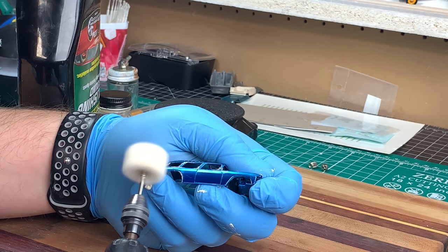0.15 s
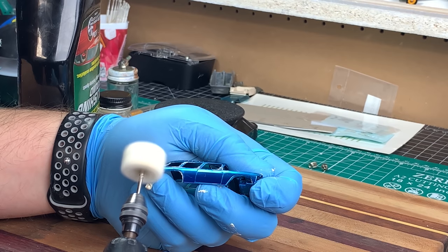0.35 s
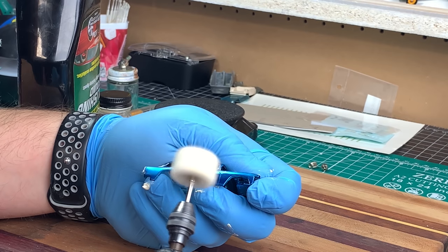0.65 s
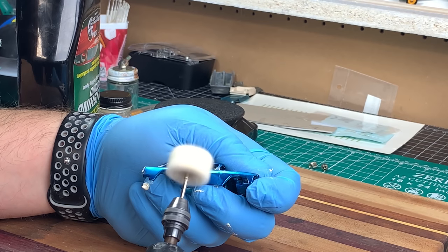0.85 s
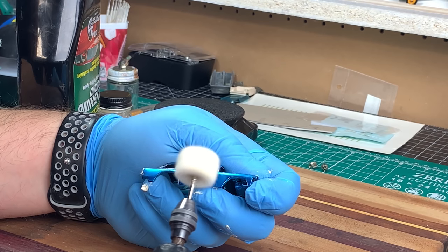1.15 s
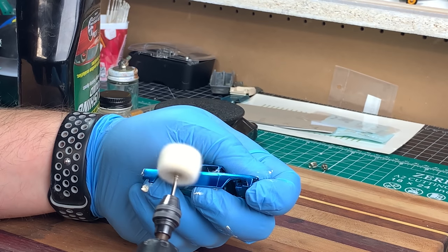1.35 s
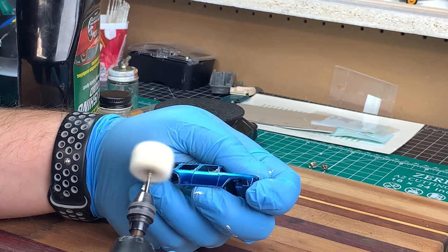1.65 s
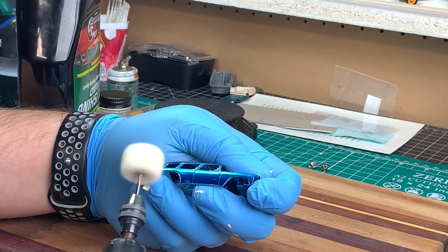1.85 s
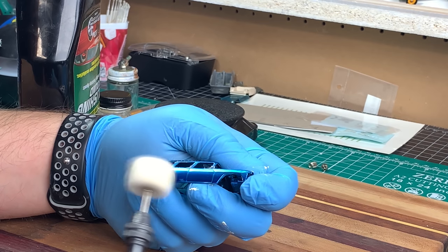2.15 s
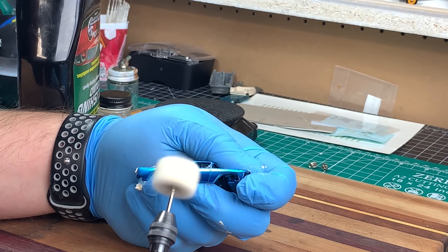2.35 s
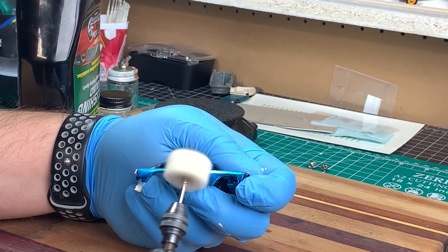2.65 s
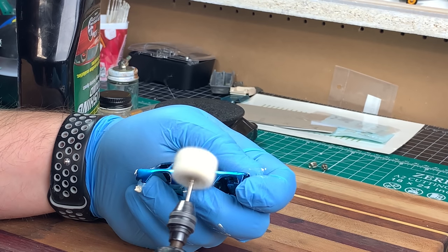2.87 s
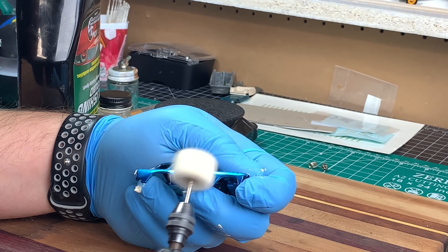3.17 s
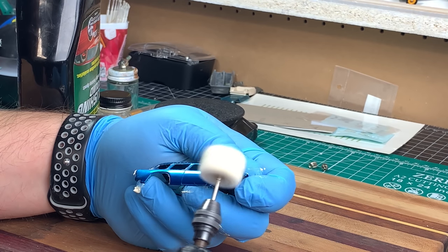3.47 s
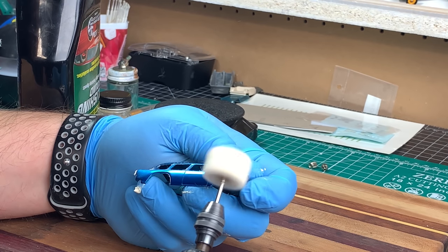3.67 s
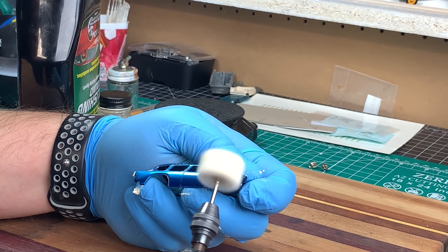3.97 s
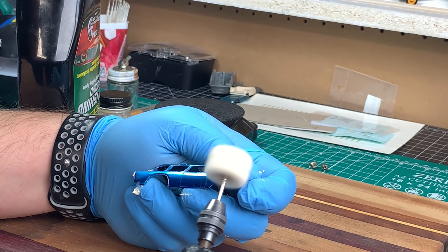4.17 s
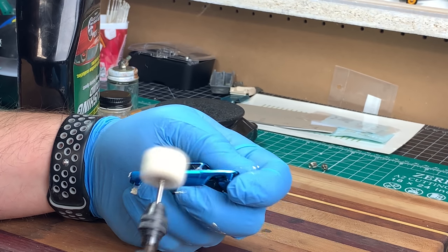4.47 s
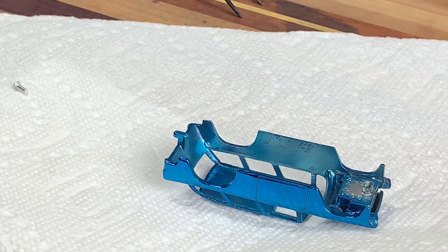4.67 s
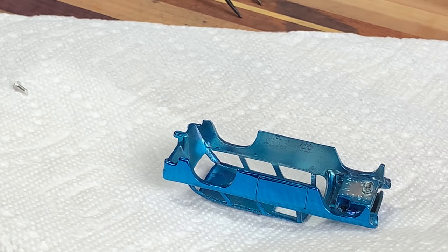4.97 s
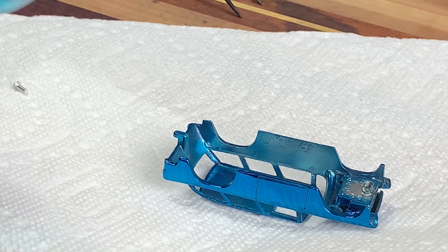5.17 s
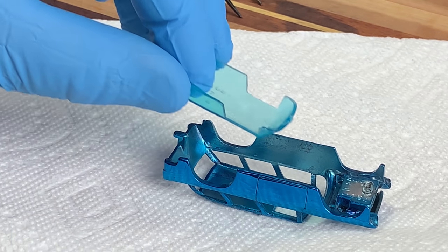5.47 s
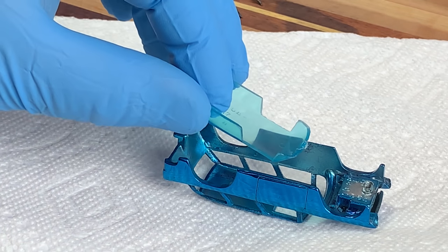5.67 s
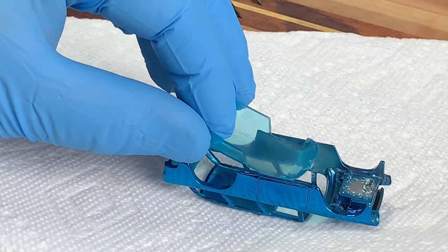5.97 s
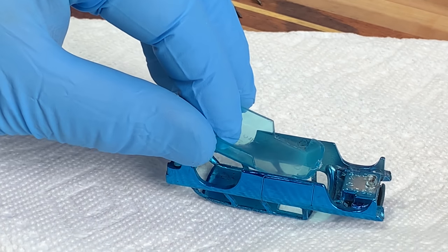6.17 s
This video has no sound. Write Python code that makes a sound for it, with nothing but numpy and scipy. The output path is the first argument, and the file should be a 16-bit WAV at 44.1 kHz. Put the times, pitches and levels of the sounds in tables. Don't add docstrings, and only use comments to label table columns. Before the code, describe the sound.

Rattling, knocking motor whirr slows and speeds as a felt wheel buffs thin metal; a hard cut leaves low air thumps, tiny clicks and glove rustle.

```python
import sys
import numpy as np
from scipy import signal
from scipy.fft import rfft, irfft, next_fast_len
from scipy.io import wavfile
from scipy.ndimage import uniform_filter1d

SR = 44100
rng = np.random.default_rng(int(sys.argv[2]) if len(sys.argv) > 2 else 0)


def voltage_ratio(decibels):
    exponent = np.asarray(decibels, float) / 20
    return 10 ** exponent


def dump(signal):
    limited = np.clip(np.atleast_2d(signal).T, -1, 1)
    pcm = np.round(limited * 32767).astype(np.int16)
    wavfile.write(sys.argv[1], SR, pcm)


N = 278579
T = np.arange(N) / SR
CUT_S = 4.6967
START_HZ, RACING_HZ = 61.7, 78


def evened(x):
    return x / np.sqrt(np.mean(x ** 2) + 1e-20)


def steadied(x, size):
    return x / np.sqrt(uniform_filter1d(x ** 2, size) + 1e-20)


def wander(size):
    return evened(uniform_filter1d(uniform_filter1d(rng.standard_normal(N), size), size))


def lag(x, seconds):
    r = np.exp(-1 / (seconds * SR))
    return signal.lfilter([1 - r], [1, -r], x)


def held(start, length, edge):
    rise = np.clip((T - start) / edge, 0, 1)
    return rise * np.clip((start + length - T) / edge + 1, 0, 1)


def spells(rows, calm_db, edge):
    swells = sum((voltage_ratio(db) * held(s, length, edge)) ** 2 for s, length, db in rows)
    return np.sqrt(voltage_ratio(calm_db) ** 2 + swells)


def noise(points, source=None):
    f, db = np.transpose(points)
    size = next_fast_len(N)
    hz = np.fft.rfftfreq(size, 1 / SR)
    source = rng.standard_normal(N) if source is None else source
    colour = voltage_ratio(np.interp(np.log(hz + 1), np.log(f + 1), db))
    return evened(irfft(rfft(source, size) * colour, size)[:N])


def ring(x, modes):
    t = np.arange(4096) / SR
    body = 0
    for k, (hz, width, db) in enumerate(modes):
        decay = np.exp(-np.pi * width * t)
        body = body + (-1) ** k * voltage_ratio(db) * np.sqrt(width) * decay * np.sin(2 * np.pi * hz * t)
    cut = signal.butter(4, 0.57 * modes[0][0], "high", fs=SR, output="sos")
    return evened(signal.sosfilt(cut, signal.oaconvolve(x, body)[:len(x)]))


def train(turns, angle, uneven, jitter_s, spread_db):
    count = int(turns[-1]) - 1
    at = np.interp(np.arange(count) + angle, turns, T)
    draw = rng.standard_normal((count, 2))
    amount = np.interp(at, T, uneven)
    place = ((at + jitter_s * amount * draw[:, 0]) * SR).astype(int)
    out = np.zeros(N)
    np.add.at(out, np.clip(place, 0, N - 1), voltage_ratio(spread_db * amount * draw[:, 1]))
    return out


def motor():
    # start in seconds, length in seconds, drag as Hz of speed lost.
    strokes = [
        (-.1, .603, 18.5),
        (.922, 1.087, 24.1),
        (2.58, .924, 15.6),
        (3.841, .587, 20.1),
    ]
    # start in seconds, length in seconds, extra drag in Hz, slap in dB.
    dabs = [(0, 0.075, 10.9, -55.5), (0.094, .11, 5.65, -60), (0.212, 0.079, 0.71, -57),
            (0.347, 0.067, 0.082, -56.5), (.43, 0.057, 9.5, -56), (1.021, 0.084, 6.2, -55),
            (1.11, 0.094, 22, -55.5), (1.222, 0.087, 22, -58.5), (1.324, 0.12, 1.24, -62),
            (1.451, .08, 0.098, -58), (1.538, .11, 10.2, -57.5), (1.71, 0.055, 19.5, -58.5),
            (1.819, 0.077, 22.8, -56), (1.937, 0.072, 7.7, -61), (2.77, .16, 20.3, -57),
            (2.93, .17, 5.9, -58.5), (3.148, 0.088, 10.0, -56), (3.326, 0.16, 8.55, -57),
            (3.879, 0.066, 5.3, -55.5), (4.01, 0.074, 5.8, -55), (4.148, 0.066, 9.1, -57.5),
            (4.276, 0.07, 17.3, -56), (4.403, .07, 18, -58)]
    stroke_edge_s, dab_edge_s = .06, .02
    free_hz, spin_up_s = 82.2, .215
    firm_db = -54
    full_drag_hz, load_lag_s, idle_load, load_bend = 40, .085, .055, 1.3
    drag = sum(hz * held(s, length, stroke_edge_s) for s, length, hz in strokes)
    drag = drag + sum(hz * held(s, length, dab_edge_s) for s, length, hz, db in dabs)
    firm = sum(voltage_ratio(db - firm_db) * held(s, length - dab_edge_s / 2, dab_edge_s) for s, length, hz, db in dabs)
    speed_hz = free_hz + (START_HZ - free_hz) * np.exp(-T / spin_up_s) - lag(drag, spin_up_s)
    slow_drag = drag[0] + lag(drag - drag[0], load_lag_s)
    load = idle_load + np.abs(slow_drag / full_drag_hz) ** load_bend
    return speed_hz, np.clip(load, 0, 1), firm


def knocking(turns, speed_hz, load):
    # angle in turns, level in dB into the low modes, in dB into the upper modes.
    knocks = [(.0, 0, -9), (.27, -4, -14), (.41, -7, 0), (.68, -6, -12), (.9, -9, -6)]
    # multiple of shaft speed, level in dB running free, in dB loaded.
    whirr = [(4, -3, -3), (5, 4, -1), (6, -1, -3), (7, 8, -4), (8, 2, 0), (9, 8, 0), (10, 7, 1), (11, 5, 4),
             (12, 1, 5), (13, 2, -1), (14, 3, 6), (15, -2, -2), (16, 3, 0), (17, 1, 0), (18, -1, 2),
             (19, 1, -1), (20, 1, -1), (21, 5, 1), (22, -3, -4), (23, 2, -3), (24, 6, 2), (25, 5, 1),
             (26, 4, -1), (27, 0, 2), (28, 2, -1)]
    last, top = whirr[-1][0], 39
    above = [(k, -.9 * (k - last - 1), -.2 * (k - last - 1)) for k in range(last + 1, top + 1)]
    k, free_db, loaded_db = np.array(whirr + above).T[:, :, None]
    coarse, step = T[::256], T[::4]
    slow_load = load[::256]
    pressed = np.minimum(2 * slow_load, 1)
    gain = voltage_ratio(free_db) + pressed * (voltage_ratio(1.4 * loaded_db) - voltage_ratio(free_db))
    speeding = np.clip(np.gradient(speed_hz[::256], coarse) / 50, 0, 1) * (1 - slow_load) ** 2
    gain *= 1 + 1.7 * uniform_filter1d(speeding, 12) * np.exp(-((k - 25.3) / 1.1) ** 2)
    chance = uniform_filter1d(rng.standard_normal(gain.shape[::-1]).T, 8, 1)
    gain *= voltage_ratio((3.0 + 4.0 * pressed) * chance)
    spin = np.array([np.interp(step, coarse, g) for g in gain]) * np.exp(2j * np.pi * k * turns[::4])
    angle, low_db, upper_db = np.transpose(knocks)
    out = []
    for db in (low_db, upper_db):
        phase = np.angle(np.exp(-2j * np.pi * k * angle) @ voltage_ratio(db))
        wave = (np.exp(1j * phase) @ spin).real
        out.append(evened(signal.resample_poly(wave, 4, 1)[:N]))
    return out


def housing(turns, speed_hz, load, firm):
    # pitch in Hz, width in Hz, level in dB.
    low_modes = [(367, 100, -12.5), (549, 69, -5.5), (614, 56, -1.5), (700, 76, -2.5), (730.8, 56, 0),
                 (820, 222, 3), (980, 196, 1), (997.4, 32, -6.5), (1259.3, 42, 3)]
    # pitch in Hz, width in Hz, level in dB.
    upper_modes = [(1360, 18, -7), (1618, 67, 2), (1755.7, 34, 10.5), (1767.7, 108, 8.5), (1835, 42, 6),
                   (1915, 45, 2.5), (2059, 31, -2), (2187, 30, -1.5), (2360, 19, -10), (2690, 26, -6)]
    faster_hz = speed_hz - START_HZ
    low_db = -47.5 + 1.15 * firm + 0.03 * faster_hz
    upper_db = -48.5 - 1.5 * firm + (0.1264 + 0.13 * load) * np.maximum(faster_hz, 0)
    shaken = turns + .008 * load * wander(size=150)
    bursts = voltage_ratio(4.0 * load * wander(size=130))
    low, upper = knocking(shaken, speed_hz, load)
    parts = ((low, low_modes, low_db, .33 + 1.35 * load),
             (upper, upper_modes, upper_db, .55 + 1.25 * load))
    out = 0
    for knocks, modes, level_db, grit in parts:
        knocks = knocks * voltage_ratio(2.5 * load * wander(size=200))
        struck = ring(knocks + grit * bursts * rng.standard_normal(N), modes)
        out = out + voltage_ratio(level_db) * steadied(struck, size=12000)
    return out


def wheel_slaps(turns, load, firm):
    # pitch in Hz, width in Hz, level in dB.
    slap_modes = [(1819, 76, 1.5), (2860, 650, -10), (4120, 370, -10.5), (4630, 450, -8.5)]
    # frequency in Hz, level in dB per Hz.
    crack = [(250, -30), (700, -2), (1500, 0), (2300, -8), (3300, -15), (6000, -21), (12000, -32)]
    blows = train(turns, .93, np.ones(N), jitter_s=.0002, spread_db=1.1)
    rattle = voltage_ratio(-4 - 60 * T[:800] / 0.004) * rng.standard_normal(800)
    slaps = ring(blows + signal.oaconvolve(blows, rattle)[:N], slap_modes)
    slaps = slaps + voltage_ratio(-2) * noise(crack, blows)
    pressed = voltage_ratio(-54) * (firm + .3 * load)
    return voltage_ratio(4.0) * pressed * slaps


def brushes_and_vanes(turns, speed_hz, load, firm):
    # frequency in Hz, level in dB per Hz.
    hiss = [(1800, -10), (2500, -1), (3100, -8.5), (4500, -3), (5300, -8.5), (5760, -0.5), (6500, -7),
            (7100, -3.5), (7800, -7), (9300, -2), (10400, -9.5), (12900, -9.5), (14300, -9.5), (16000, -29)]
    # frequency in Hz, level in dB per Hz.
    windage = [(3500, -17), (4900, -3), (6500, 1), (8000, -1), (10500, -18), (12600, -7), (14000, -21)]
    hiss_db = -62 + 3.5 * firm + 0.2247 * np.maximum(speed_hz - 62.8, 0)
    windage_db = -56.5 - .6 * (RACING_HZ - speed_hz)
    throb = 1 + 0.31 * np.cos(6 * np.pi * (turns - .95)) + 0.12 * np.cos(2 * np.pi * (turns - .95))
    clicks = sum(train(turns, angle, .15 + load, jitter_s=.00005, spread_db=3.0)
                 for angle in (.1, .23, .39, .52, .66, .78, .93, .97))
    brushes = (.7 + .3 * load) * throb * noise(hiss) + (1 - load) * noise(hiss, clicks)
    return voltage_ratio(hiss_db + 5.0) * brushes + voltage_ratio(windage_db) * throb * noise(windage)


def speed_control(turns, speed_hz, firm):
    # multiple of switching, multiple of shaft speed, level in dB.
    sidebands = [(1, 0, -10), (1, 3, -12), (2, 0, 1), (2, -3, -4), (2, 3, -7), (2, -6, -5), (2, 6, -13),
                 (2, -12, -6), (2, -9, -13), (3, 0, -8), (3, -3, -8), (3, 3, -14), (3, -12, -15)]
    switch = np.cumsum(4565.5 + .22 * (speed_hz - 60)) / SR
    carrier_db = -63.5 - 2 * firm + wander(size=5000)
    whine = 0
    for m, k, db in sidebands:
        fade_db = 2.5 * wander(size=6000) * (k != 0)
        level_db = carrier_db if k == 0 else -63.5
        wave = np.cos(2 * np.pi * (m * switch + k * turns + rng.random()))
        whine = whine + voltage_ratio(level_db + db + fade_db) * wave
    return np.sqrt(2) * whine


def shaft_hum(turns, speed_hz):
    # multiple of shaft speed, level in dB running free, in dB loaded.
    orders_low = [(1, -63, -72), (2, -84, -75), (3, -76, -68), (5, -68, -80), (6, -74, -80)]
    labouring_hz = 52
    sag = np.clip((RACING_HZ - speed_hz) / (RACING_HZ - labouring_hz), 0, 1) ** .8
    hum = 0
    for k, free_db, loaded_db in orders_low:
        wave = np.cos(2 * np.pi * (k * turns + rng.random()))
        hum = hum + voltage_ratio(free_db + sag * (loaded_db - free_db)) * wave
    return np.sqrt(2) * hum


def shop():
    # frequency in Hz, level in dB per Hz.
    rumble = [(2, -6), (6, 0), (18, -3), (35, -14), (70, -21), (110, -30), (250, -39), (430, -40),
              (700, -45), (1000, -60)]
    fan = np.sqrt(2) * voltage_ratio(-53) * np.sin(2 * np.pi * 53.1 * T)
    return fan + voltage_ratio(-53) * noise(rumble)


def draught():
    # start in seconds, length in seconds, level in dB.
    pushes = [
        (4.71, 0.032, -27),
        (4.85, 0.14, -26.5),
        (5.09, 0.18, -32.5),
        (5.44, 0.07, -38),
        (5.83, 0.046, -32.5),
        (6.07, 0.11, -43),
        (6.26, .02, -32.5),
    ]
    # start in seconds, length in seconds, level in dB.
    gusts = [(4.77, 0.031, -53), (4.86, .04, -51), (5.05, 0.066, -53), (5.13, .12, -47.5),
             (5.28, 0.067, -53.5), (5.37, 0.099, -50.5), (5.46, 0.092, -50), (5.56, 0.16, -43),
             (5.72, 0.052, -50), (5.79, 0.061, -43.5), (5.88, 0.092, -68), (6.18, 0.056, -58),
             (6.26, 0.013, -51.5)]
    # frequency in Hz, level in dB per Hz.
    buffet = [(15, -50), (28, 9), (70, 3.5), (130, -14), (200, -43), (300, -59)]
    push, gust = spells(pushes, -40.5, 0.036), spells(gusts, -63.5, 0.024)
    slow = noise([(1, 0.0), (2, 5.5), (6, 8.0), (14, -20.5), (25, -25.5), (40, -78)])
    out = push * steadied(slow, size=9000) + gust * steadied(noise(buffet), size=2500)
    blow = uniform_filter1d(gust / voltage_ratio(-43), size=4000)
    flap_hz = (49.3 + 78.8 * blow ** 2) * (1 + 0.066 * wander(size=500))
    flaps = np.sin(2 * np.pi * np.cumsum(flap_hz) / SR)
    return out + voltage_ratio(-51.5 + 2.2 * wander(size=600)) * blow ** 2 * flaps


def room_air():
    # start in seconds, length in seconds, level in dB.
    air_spells = [
        (4.68, 1.0, -66),
        (5.74, 0.088, -67),
        (6.17, 0.1, -68.5),
    ]
    # frequency in Hz, level in dB per Hz.
    air = [(100, -45), (180, -5.5), (400, -6), (700, -11), (1000, -26), (2000, -26), (3000, -32)]
    return spells(air_spells, -76, 0.027) * voltage_ratio(0.68 * wander(size=700)) * noise(air)


def glove_rustle():
    # start in seconds, length in seconds, level in dB.
    glove_moves = [
        (4.87, 0.51, -77),
        (5.57, 0.088, -79),
        (5.76, 0.041, -86),
        (6.16, 0.072, -74),
    ]
    # frequency in Hz, level in dB per Hz.
    rustle = [(530, -30), (900, -1), (2000, -4), (3300, -13), (6500, -8), (10000, -11), (15800, -20)]
    return spells(glove_moves, -82, 0.02) * noise(rustle)


def plastic_ticks():
    # time in seconds, level in dB, pitch in Hz, seconds to fall 60 dB,
    # second pitch in Hz, its level in dB.
    tick_rows = [
        (4.912, -61, 4300, .02, 4500, -8),
        (5.076, -52.5, 9100, .025, 5500, -6),
        (5.192, -41.5, 1300, 0.14, 2580, -11),
        (5.35, -68, 4800, .02, 7000, -6),
        (5.5, -61, 700, 0.038, 1500, -8),
    ]
    out, t = np.zeros(N), np.arange(6000) / SR
    for s, db, hz, t60, second_hz, second_db in tick_rows:
        pair = np.sin(2 * np.pi * hz * t) + voltage_ratio(second_db) * np.sin(2 * np.pi * second_hz * t)
        pair = pair * voltage_ratio(-60 * t / 0.0076)
        tail = ring(rng.standard_normal(6000), [(hz, hz / 3, 0), (second_hz, hz / 3, second_db)])
        out[round(s * SR):][:6000] += voltage_ratio(db) * (pair + voltage_ratio(-15.5 - 60 * t / t60) * tail)
    return out


def glove_snaps():
    # time in seconds, level in dB, lowest frequency in Hz, seconds to fall 60 dB.
    snap_rows = [(5.735, -61, 5000, .004), (5.74, -55.5, 2500, 0.013), (5.7445, -55, 2500, .015),
                 (5.7535, -59, 4970, .005), (5.761, -51.5, 6050, 0.0045), (5.773, -69, 6000, .006),
                 (5.787, -64, 5000, .008), (5.7935, -72.5, 5000, .004), (5.799, -68, 9000, .004)]
    out, t = np.zeros(N), np.arange(1500) / SR
    for s, db, low_hz, t60 in snap_rows:
        bright = signal.butter(3, low_hz, "high", fs=SR, output="sos")
        burst = signal.sosfilt(bright, rng.standard_normal(1500))
        out[round(s * SR):][:1500] += voltage_ratio(db - 60 * t / t60) * burst
    return out


def scrape():
    # pitch in Hz, width in Hz, level in dB.
    scrape_modes = [(700, 560, 6), (1300, 660, 5), (1950, 340, 1), (2800, 480, -4), (4400, 900, -6)]
    start_s, rise_s = 6.165, 0.034
    grains = rng.standard_normal(N) * voltage_ratio(1.9 * rng.exponential(1, N))
    onset = np.clip((T - start_s) / rise_s, 0, 1)
    level_db = -69 - 50 * np.maximum(T - start_s - rise_s, 0)
    return onset * voltage_ratio(level_db) * ring(grains, scrape_modes)


def scene():
    speed_hz, load, firm = motor()
    turns = np.cumsum(speed_hz) / SR
    workshop = housing(turns, speed_hz, load, firm) + wheel_slaps(turns, load, firm)
    workshop = workshop + brushes_and_vanes(turns, speed_hz, load, firm)
    workshop = workshop + speed_control(turns, speed_hz, firm) + shaft_hum(turns, speed_hz) + shop()
    table = draught() + room_air() + glove_rustle() + plastic_ticks() + glove_snaps() + scrape()
    at = round(CUT_S * SR)
    jump = workshop[at - 400:at].mean() - table[at] - voltage_ratio(-33)
    table = table + jump * np.exp(-np.maximum(T - CUT_S, 0) / 0.041)
    table = table * np.minimum((T[-1] - T) / .008, 1)
    return np.where(T < CUT_S, workshop, table)[None]


def low_pass(x):
    return signal.sosfilt(signal.butter(12, 15960, fs=SR, output="sos"), x)


def record(dry):
    hz, t, z = signal.stft(dry, SR, nperseg=1024)
    patches = rng.standard_normal(z.shape[:0:-1]).T
    patches = uniform_filter1d(uniform_filter1d(patches, 9, 0), 4, 1)
    spared = .9 * evened(uniform_filter1d(rng.standard_normal(z.shape[-1]), 14))
    spared = np.where(t < CUT_S, spared, .7)
    needed = np.interp(hz, [13900, 14300, 15700], [-5, -.9, .4])[:, None]
    kept = evened(patches) + spared > needed
    limited = signal.istft(z * kept * (hz < 15750)[:, None], SR, nperseg=1024)[1][:, :N]
    return low_pass(limited)


dry = scene()
out = record(dry)
dump(out)
```